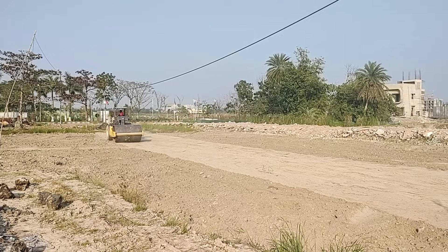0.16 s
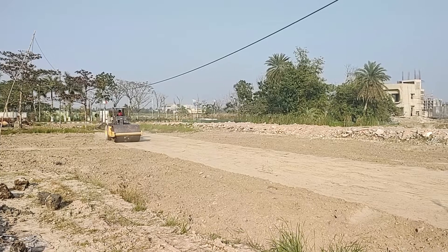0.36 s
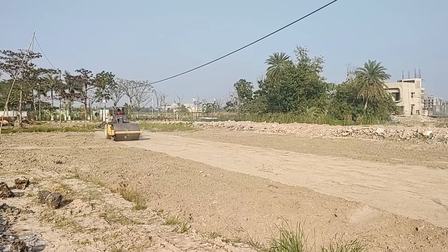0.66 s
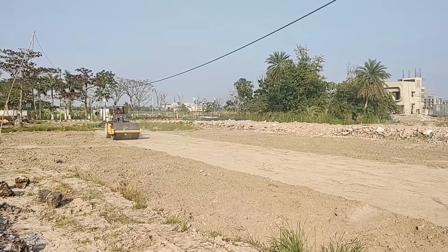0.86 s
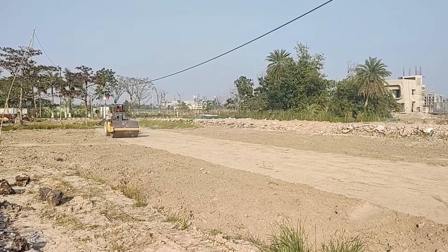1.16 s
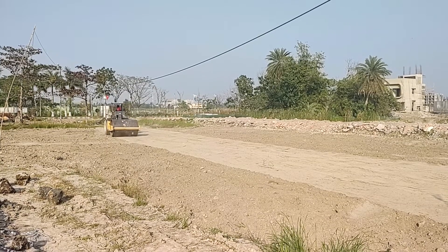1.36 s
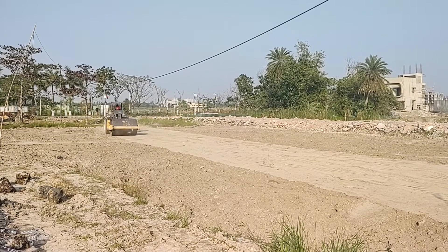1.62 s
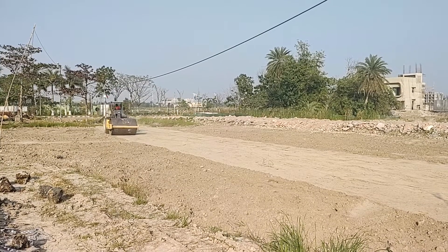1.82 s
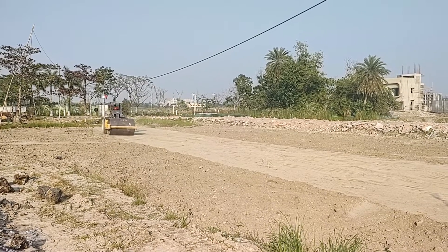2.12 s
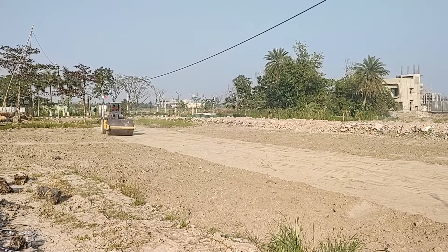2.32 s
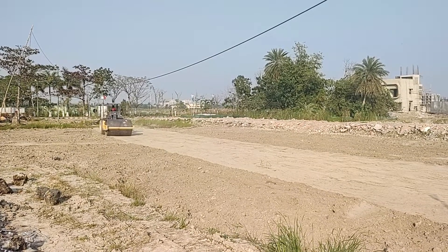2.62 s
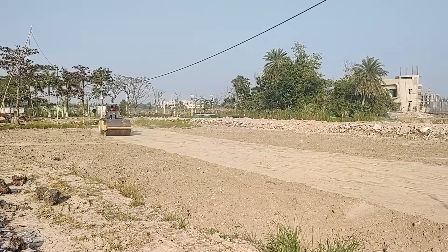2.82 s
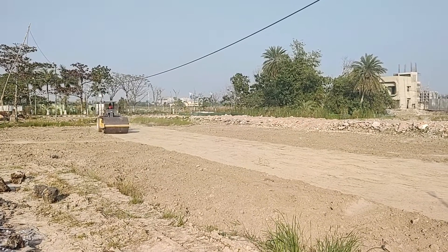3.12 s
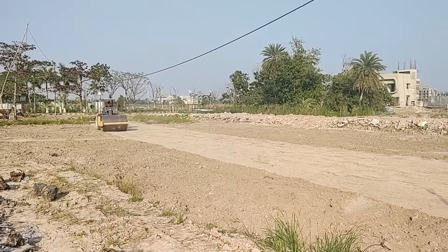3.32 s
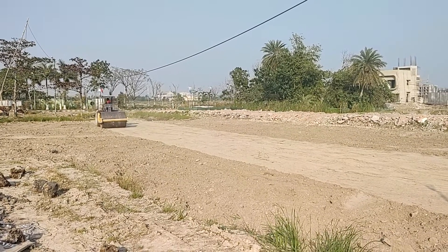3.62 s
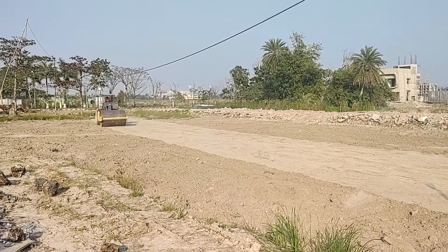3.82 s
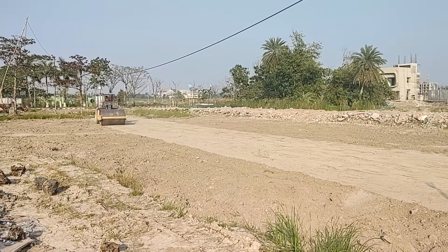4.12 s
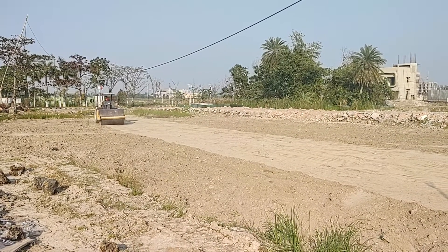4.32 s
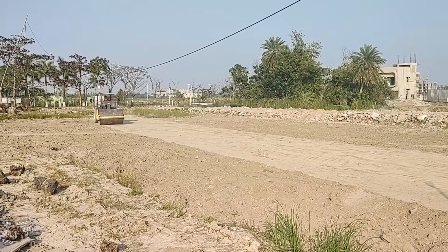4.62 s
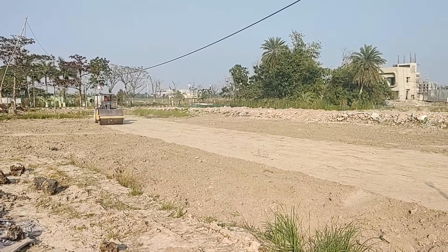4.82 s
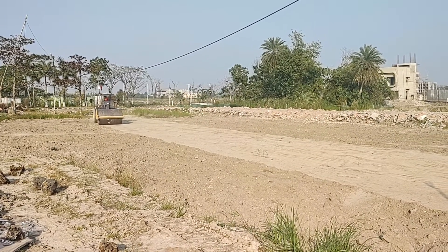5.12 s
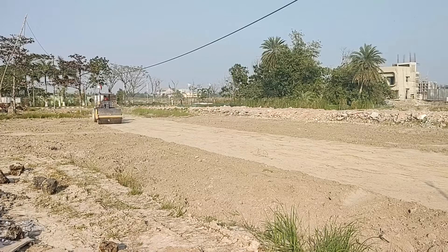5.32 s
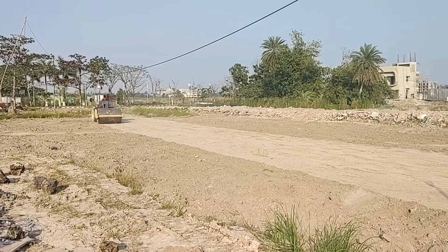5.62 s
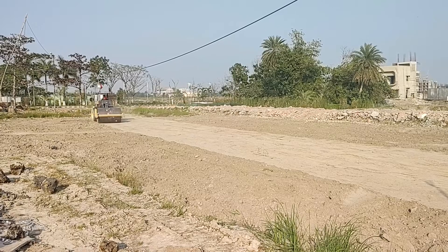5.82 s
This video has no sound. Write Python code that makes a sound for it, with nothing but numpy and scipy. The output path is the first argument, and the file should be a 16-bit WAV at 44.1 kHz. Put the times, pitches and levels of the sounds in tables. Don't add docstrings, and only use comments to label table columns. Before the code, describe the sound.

Steady engine hum and mechanical clatter of a distant soil compactor outdoors, soft wind buffeting the microphone, a dull plate clank past midway.

```python
import sys
import numpy as np
from scipy import signal
from scipy.fft import rfft, irfft
from scipy.io import wavfile
from scipy.ndimage import uniform_filter1d, map_coordinates

SR = 44100
rng = np.random.default_rng(int(sys.argv[2]) if len(sys.argv) > 2 else 0)


def unload_wav(signal):
    wavfile.write(
        sys.argv[1],
        SR,
        np.round(np.clip(np.atleast_2d(signal).T, -1, 1) * 32767).astype(np.int16),
    )


def boost_factor(decibels):
    exponent = np.asarray(decibels, float) / 20
    return 10 ** exponent


N = 262836
TIME = np.arange(N) / SR
GOVERNED_HZ = 20.723


def level(x, db):
    return x * boost_factor(db) / np.sqrt(np.mean(x ** 2))


def walk(rate):
    knots = rng.standard_normal(int(N / SR * rate) + 4)
    coarse_at = np.arange(0, N + 64, 64)
    coarse = map_coordinates(knots, [coarse_at / SR * rate + 1], order=3)
    return np.interp(np.arange(N), np.arange(len(coarse)) * 64, coarse)


def coloured(x, spectrum):
    hz, db = np.transpose(spectrum)
    log_hz = np.log(np.arange(N // 2 + 1) * SR / N + 1)
    gain_db = np.interp(log_hz, np.log(hz), db, -150, -150)
    return irfft(rfft(x) * boost_factor(gain_db), N)


def ring(x, hz, width_hz):
    return signal.lfilter(*signal.iirpeak(hz, hz / width_hz, SR), x)


def clicks(s, size):
    out, at = np.zeros(N + 2), np.clip(s * SR, 0, N)
    np.add.at(out, at.astype(int), size * (1 - at % 1))
    np.add.at(out, at.astype(int) + 1, size * (at % 1))
    return out[:N]


def add(out, s, sound):
    i = int(s * SR)
    out[i:i + len(sound)] += sound[:N - i]


# start in seconds, peak level in dB, swing frequency in Hz,
# direction of push as a sign.
THUMPS = [(0.137, -25.5, 131, 1), (0.387, -28, 124, 1), (.417, -31, 144, -1), (0.435, -32, 150, -1),
          (.461, -36, 150, 1), (0.546, -31, 125, 1), (.563, -36, 140, 1), (0.579, -27, 130, 1),
          (0.618, -27, 115, 1), (.639, -33, 150, 1), (1.01, -36, 130, -1), (1.034, -35, 130, -1),
          (1.074, -35, 130, 1), (1.161, -34, 138, 1), (1.222, -36, 141, -1), (2.472, -38, 125, 1),
          (2.908, -34, 140, 1), (2.97, -31, 137, 1), (3.03, -37, 138, 1), (3.055, -37, 131, 1),
          (3.145, -38, 140, 1), (3.727, -30, 146, 1), (4.401, -27, 135, 1), (4.433, -37, 142, -1),
          (4.459, -35, 150, -1)]


def buffeting():
    gust_s = .05
    gusts = sum(np.exp(-.5 * ((TIME - row[0]) / gust_s) ** 2) for row in THUMPS)
    breeze_db = -60 + 1.5 * walk(5.07)
    return boost_factor(breeze_db + 2.5 * np.tanh(gusts))


# frequency in Hz, level in dB per Hz.
WIND = [(15, -13), (30, -20), (48, -23), (58, -7), (70, -0.5), (110, -4), (160, -5.5), (200, -10.5),
        (260, -16.5), (400, -41.5)]


def wind():
    lumps = boost_factor(2.5 * walk(30))
    out = level(coloured(lumps * rng.standard_normal(N), WIND), 6.6) * buffeting()
    for s, db, hz, push in THUMPS:
        cycles = TIME[:SR // 10] * hz
        envelope = 1.75 * (1 - np.exp(-cycles / .11)) * np.exp(-cycles / .68)
        add(out, s, np.sign(push) * boost_factor(db) * envelope * np.sin(2 * np.pi * cycles))
    return out


# start in seconds, peak level in dB.
CLANKS = [
    (3.7575, -22.5),
    (3.789, -33),
    (3.824, -31),
    (3.874, -36),
]
# frequency in Hz, level in dB, decay by 60 dB in seconds.
PLATE = [
    (440, -14, .1),
    (522, -33, 1.2),
    (585, -15, .12),
    (725, -25, .5),
    (800, -2, .03),
    (870, 2, .03),
    (925, -12, .08),
]
# start in seconds, level in dB.
HUMS = [
    (.7, -55.5),
    (.88, -62),
    (3.83, -53),
    (3.94, -53.5),
]


def plate():
    out, tail, age = np.zeros(N), np.zeros(N), TIME[:SR]
    for s, db in CLANKS:
        for hz, mode_db, t60 in PLATE:
            detune = 1 + 0.004 * rng.standard_normal()
            swing = np.sin(2 * np.pi * hz * detune * age)
            decay = boost_factor(db + 3 + mode_db - 60 * age / t60)
            add(out, s, (1 - np.exp(-age / .007)) * decay * swing)
        add(tail, s, (1 - np.exp(-age / .025)) * boost_factor(db - 60 * age / 0.65))
    long_mode = np.sin(2 * np.pi * PLATE[1][0] * age)
    for s, db in HUMS:
        add(out, s, boost_factor(db) * age / 0.054 * np.exp(1 - age / 0.048) * long_mode)
    diffuse = ring(ring(tail * rng.standard_normal(N), 650, 600), 650, 900)
    return out + boost_factor(-11.5) * diffuse


# middle in seconds, length in seconds,
# rise of the cycle in Hz.
SURGES = [
    (.1, .7, .03),
    (1.58, 1.2, .16),
    (2.2, .45, -.03),
    (2.72, .6, .165),
    (4.6, .65, .2),
]


def crank():
    hz = np.full(N, GOVERNED_HZ)
    for s, length, rise in SURGES:
        hz = hz + rise * np.cos(np.pi * np.clip((TIME - s) / length, -.5, .5)) ** 2
    return np.cumsum(hz) / SR


# time in seconds, level in dB rms.
LOAD = [(0, -39), (.35, -43), (.62, -37), (.98, -38), (1.3, -44), (1.75, -46), (2.1, -45.5), (2.45, -40),
        (2.92, -43.5), (3.35, -37.5), (3.72, -38.5), (4.05, -44.5), (4.5, -58.5), (4.9, -38), (5.12, -38),
        (5.52, -46.5), (5.96, -39)]


def load():
    return uniform_filter1d(np.interp(TIME, *np.transpose(LOAD)), SR // 8)


def heard(load_db, db, share, loss_db, wander_db):
    draw_off_s = 1.1
    swing_db = share * (load_db - np.mean(load_db))
    distance_db = loss_db * np.log(1 + TIME / draw_off_s)
    return boost_factor(db + swing_db - distance_db + wander_db * walk(3.11))


def strokes(turns, place, db, scatter_db, jitter_s):
    late, strength = rng.standard_normal((int(turns[-1]) + 1, 2)).T
    s = np.interp(np.arange(len(late)) + place, turns, TIME) + jitter_s * late
    return clicks(s, boost_factor(db + scatter_db * strength))


# place in the cycle from 0 to 1, knock level in dB.
CYLINDERS = [
    (.115, 3),
    (.27, -3),
    (.46, 5),
    (.6, 3),
    (.76, -3),
    (.91, -2),
]


def firings(turns):
    return sum(strokes(turns, place, db, 0.86, 0) for place, db in CYLINDERS)


def roar(blows, spectrum, gate, flicker_db):
    puff_s = 0.0082
    puff = signal.lfilter([1], [1, -np.exp(-1 / (puff_s * SR))], blows)
    flow = 1 + gate * (puff / np.mean(puff) - 1)
    return coloured(flow * boost_factor(flicker_db * walk(11)) * rng.standard_normal(N), spectrum)


# frequency in Hz, level in dB per Hz.
ROAR_HIGH = [(2000, -26.5), (3400, -7), (3690, 0.5), (3990, -1.5), (4690, 0), (5040, -4), (5760, -6),
             (6210, -14.5), (7240, -9.5), (7700, -13.5), (10000, -53.5), (16900, -120)]


def fan(blows, load_db):
    hiss = level(roar(blows, ROAR_HIGH, gate=0.19, flicker_db=0.26), 5.53)
    return heard(load_db, db=-74.5, share=0, loss_db=0.04, wander_db=0.9) * hiss


# middle in seconds, rise in dB.
SPOOLS = [
    (.58, 7),
    (1.8, 7),
    (2.449, 5.5),
    (3.9, 0),
    (4.83, 3.5),
    (5.6, 7),
]


def turbo(load_db):
    spool_s = 0.19
    rush = level(ring(ring(rng.standard_normal(N), 4600, 450), 4600, 600), -7.0)
    rise_db = sum(db * np.exp(-.5 * ((TIME - s) / spool_s) ** 2) for s, db in SPOOLS)
    return heard(load_db, db=-77, share=0.5, loss_db=-1.5, wander_db=-0.5) * rush * boost_factor(rise_db)


def clatter(turns, renew=.12):
    size = 2048
    fresh = rng.standard_normal((int(turns[-1]) + 22, size))
    rounds = signal.lfilter([1], [1, renew - 1], fresh, axis=0)[20:].ravel()
    return map_coordinates(rounds, [turns * size], order=1)


# place in the cycle from 0 to 1, resonance in Hz, level in dB.
VALVES = [(.21, 1300, -4), (.36, 1540, 0), (.78, 1660, -1), (.8, 1950, -4), (.06, 2100, -5),
          (.63, 2300, -5), (.82, 2400, -4)]


def valves(turns):
    out = np.zeros(N)
    for place, hz, db in VALVES:
        ticks = strokes(turns, place, db, 3, .0001)
        out = out + ring(ring(ticks, hz, 220), hz, 300)
    return out


# frequency in Hz, level in dB per Hz.
ROAR_MID = [(780, -24.5), (1330, -6.5), (1470, -1.5), (1760, -1.5), (2120, -3.5), (2400, -5.5),
            (2600, -3.5), (2770, -7), (3140, -13.5), (3400, -21.5), (4420, -61.5), (7480, -120)]


def drum(turns, blows, load_db):
    rolling = level(roar(blows, ROAR_MID, gate=.13, flicker_db=.4), -1.2)
    linkages = level(coloured(clatter(turns), ROAR_MID), -6)
    ticks = level(valves(turns), -10)
    return heard(load_db, db=-53.5, share=0.14, loss_db=0.85, wander_db=.5) * (rolling + linkages + ticks)


# place in the cycle from 0 to 1, frequency in Hz, level in dB.
PANELS = [(.9, 70, 0), (.1, 190, 0), (.55, 250, 0), (.0, 300, -1), (.25, 365, 0), (.7, 400, -1),
          (.95, 490, -2), (.6, 620, 0), (.13, 750, 1), (.8, 800, -3), (.93, 960, -2), (.5, 850, 3),
          (.64, 920, -1), (.44, 1020, 2), (.375, 1140, -1), (.8, 1180, -2)]


def starts(table, reach_hz=60):
    order = np.transpose(table)[0][:, None]
    place, hz, db = np.transpose(PANELS)
    near = boost_factor(db) * np.exp(-.5 * ((order * GOVERNED_HZ - hz) / reach_hz) ** 2)
    return np.angle(np.sum(near * np.exp(-2j * np.pi * order * place), axis=1))


def orders(turns, table, fade_db, drift):
    out = 0
    for (order, db), start in zip(table, starts(table)):
        strength = boost_factor(db + fade_db * walk(3.7))
        out = out + strength * np.cos(2 * np.pi * order * turns + start + drift * walk(3))
    return np.sqrt(2) * out


# multiple of the cycle, level in dB rms.
GEARS = [(60, -71), (68, -72), (70, -75), (73, -69), (75, -74), (88, -76), (105, -77)]


def gears(turns):
    return orders(turns, GEARS, fade_db=4.0, drift=1.0)


# multiple of the cycle, level in dB rms.
CASING = [(30, -76.8), (31, -72.0), (32, -67.0), (33, -66.0), (34, -69.9), (35, -77.1), (36, -63.6),
          (37, -62.0), (38, -64.9), (39, -59.1), (40, -63.7), (41, -72.3), (42, -61.6), (43, -68.2),
          (44, -63.2), (45, -66.7), (46, -63.5), (47, -70.0), (48, -64.7), (49, -71.6), (50, -64.3),
          (51, -64.2), (52, -69.2), (53, -67.8), (54, -65.5), (55, -72.4), (56, -77.4), (57, -73.1),
          (58, -77.0), (59, -75.1)]
# frequency in Hz, level in dB per Hz.
ROAR_LOW = [(150, -12), (200, 0), (250, -3), (350, -3), (430, -6), (500, -5), (570, -15), (640, -8),
            (730, 1), (880, 2), (1000, -1), (1150, -5), (1300, -10), (1450, -30)]


def block(turns, blows, load_db):
    knocks = boost_factor(.7 * walk(30)) * orders(turns, CASING, fade_db=1, drift=.3)
    gas = roar(blows, ROAR_LOW, gate=.2, flicker_db=.6)
    mixed = level(knocks, -1.5) + level(gas, -4)
    return heard(load_db, db=-48, share=0.1, loss_db=0.55, wander_db=0.86) * mixed


# multiple of the cycle, level in dB rms.
EXHAUST = [(3, -56.8), (4, -59.1), (5, -58.9), (6, -42.4), (7, -63.3), (8, -69.6), (9, -58.6), (10, -68.8),
           (11, -67.4), (12, -59.1), (13, -67.9), (14, -58.8), (15, -72.7), (16, -61.7), (17, -71.1),
           (18, -64.8), (19, -63.3), (20, -70.0), (21, -75.2), (22, -70.8), (23, -76.7), (24, -66.9),
           (25, -73.9), (26, -81.9), (27, -80.0), (28, -79.3), (29, -76.9)]


def exhaust(turns, load_db):
    boom = np.sqrt(2) * boost_factor(load_db) * np.cos(2 * np.pi * 6 * turns - np.pi + .3 * walk(5))
    others = [row for row in EXHAUST if row[0] != 6]
    hum = orders(turns, others, fade_db=.7, drift=.25)
    return boom + heard(load_db, db=1.7, share=0.11, loss_db=0.9, wander_db=.8) * hum


def scene():
    load_db, turns = load(), crank()
    blows = firings(turns)
    surroundings = wind() + plate()
    machinery = fan(blows, load_db) + turbo(load_db) + gears(turns) + drum(turns, blows, load_db)
    engine = machinery + block(turns, blows, load_db) + exhaust(turns, load_db)
    return (surroundings + engine)[None]


def band_limit(x):
    return signal.sosfilt(signal.butter(12, 8400, fs=SR, output="sos"), x)


def record(dry):
    x = signal.sosfilt(signal.butter(4, 55, "high", fs=SR, output="sos"), dry)
    x = x + level(ring(rng.standard_normal(N), 17, 25), -75.0)
    x = signal.sosfilt(signal.butter(12, 7750, fs=SR, output="sos"), x)
    return band_limit(x)


dry = scene()
out = record(dry)
unload_wav(out)
```